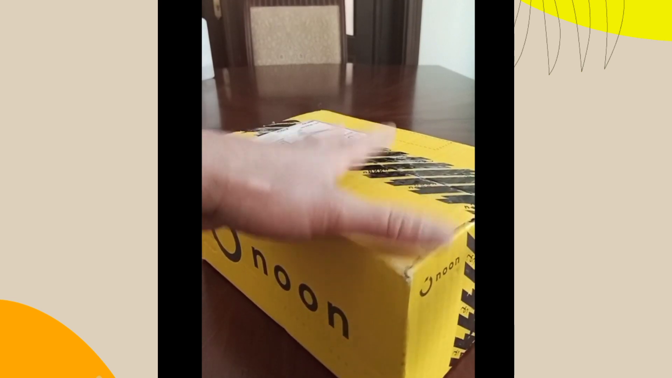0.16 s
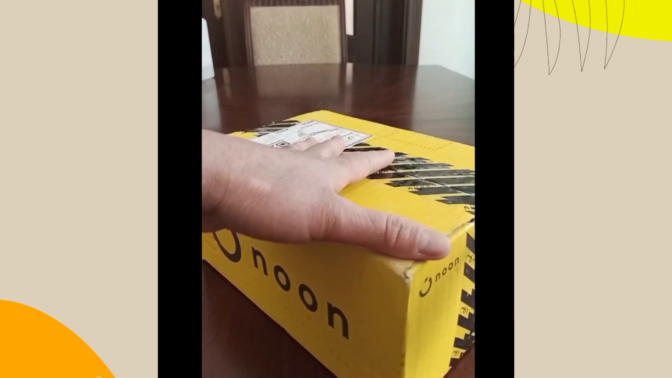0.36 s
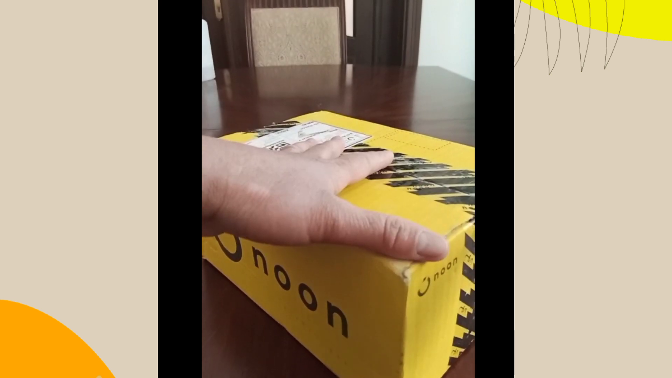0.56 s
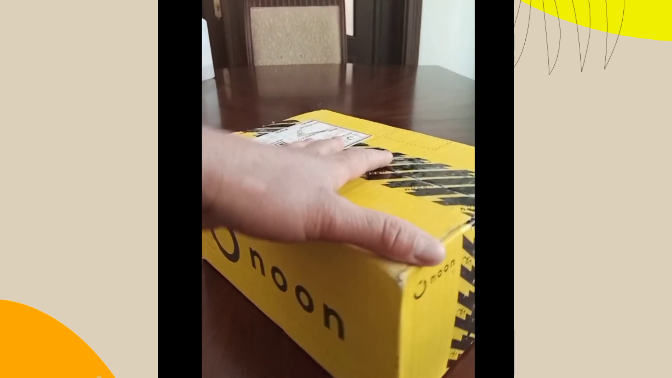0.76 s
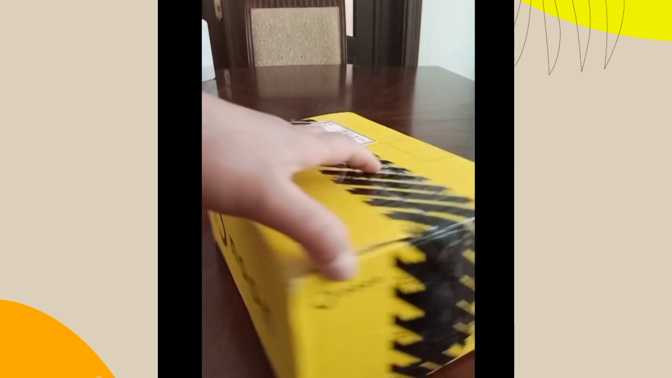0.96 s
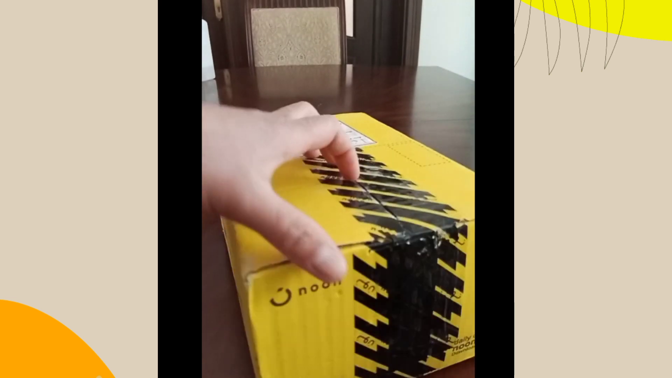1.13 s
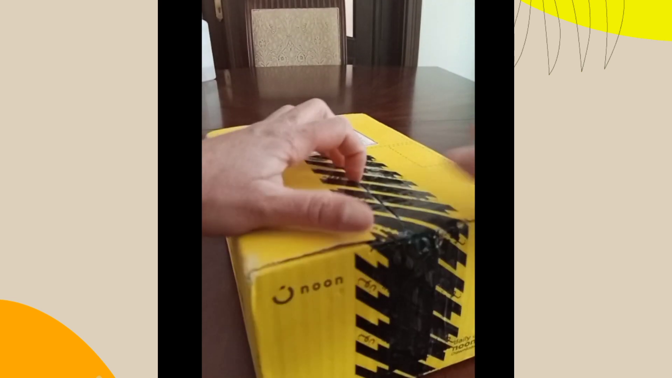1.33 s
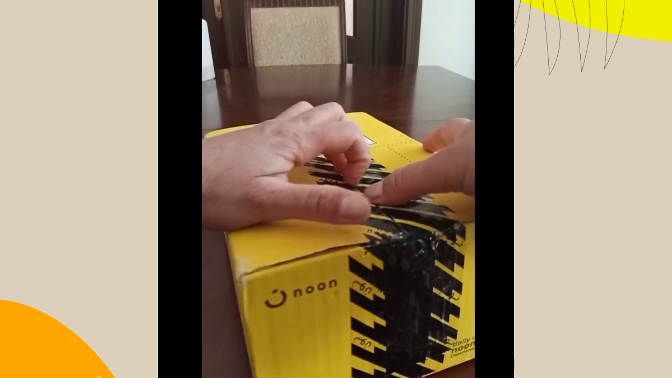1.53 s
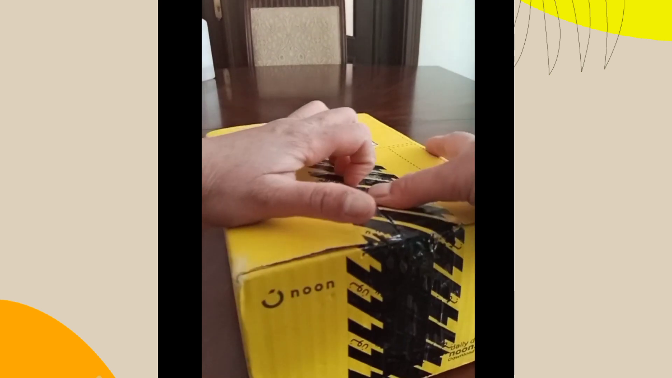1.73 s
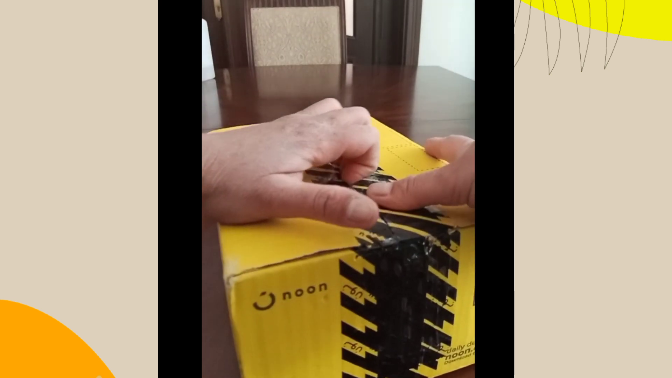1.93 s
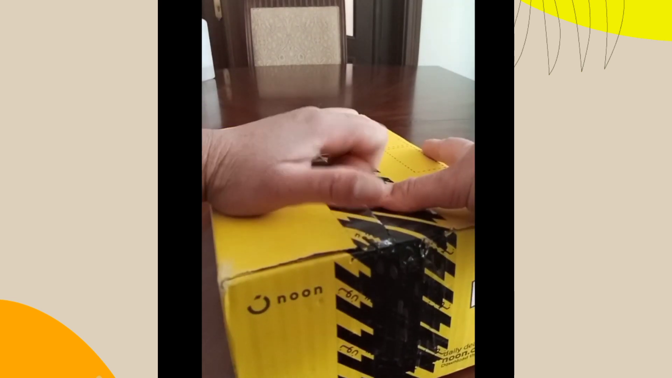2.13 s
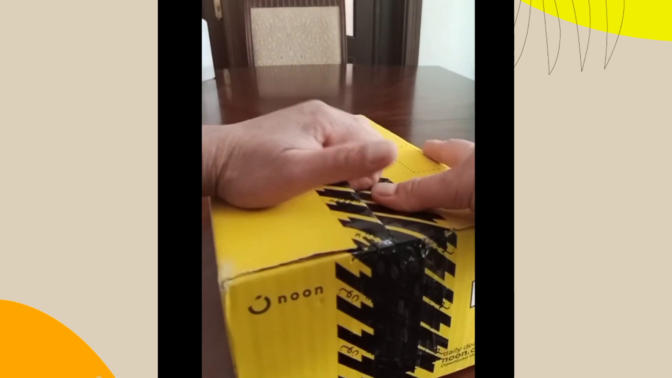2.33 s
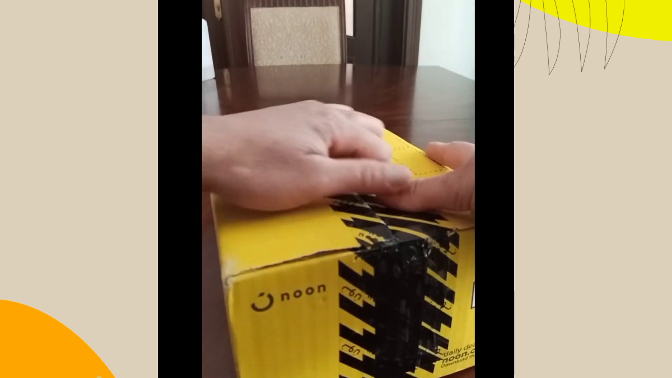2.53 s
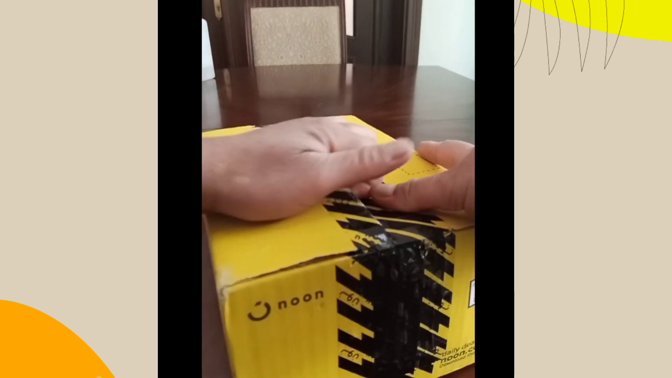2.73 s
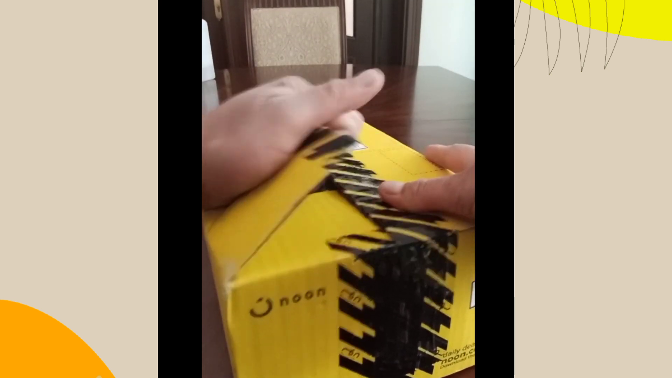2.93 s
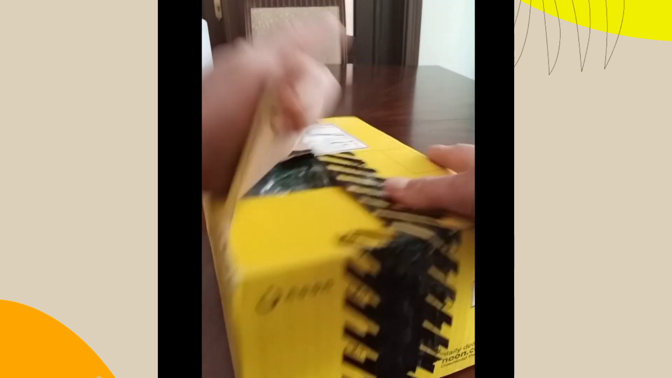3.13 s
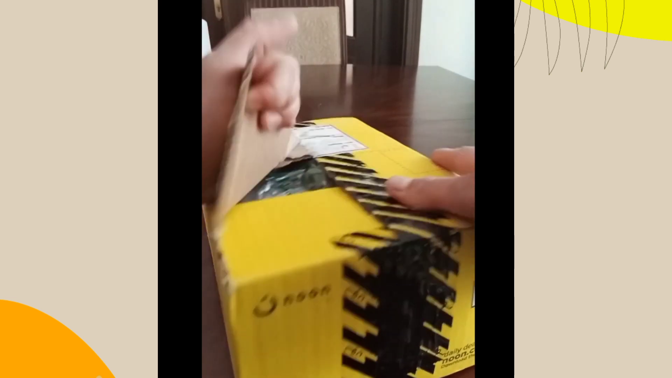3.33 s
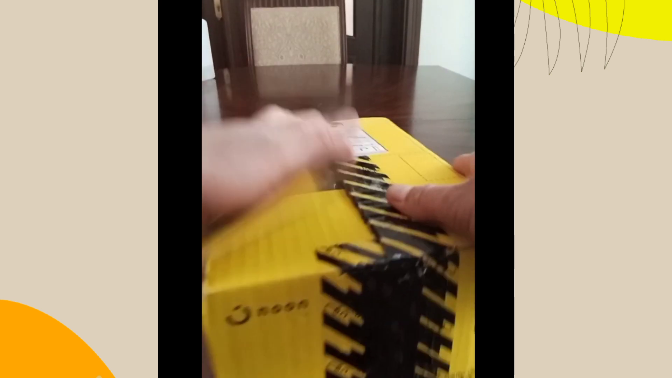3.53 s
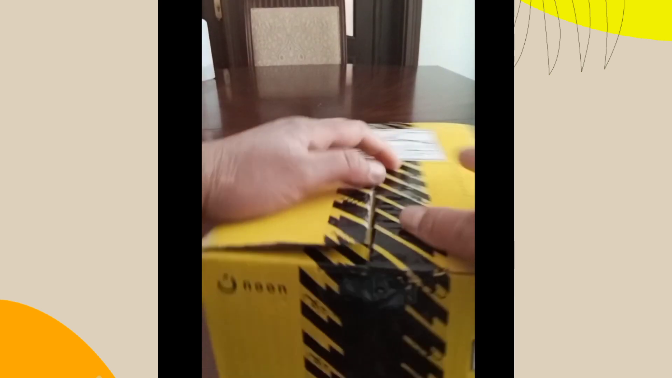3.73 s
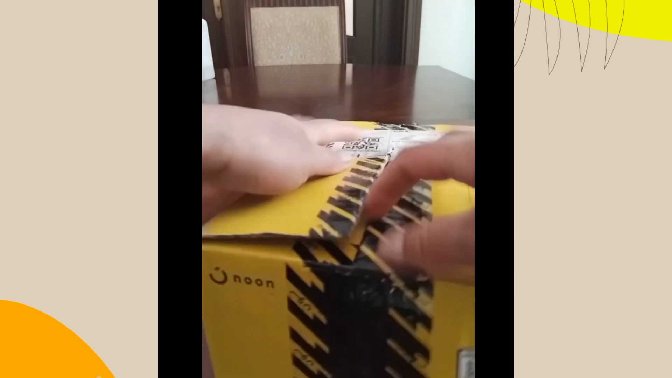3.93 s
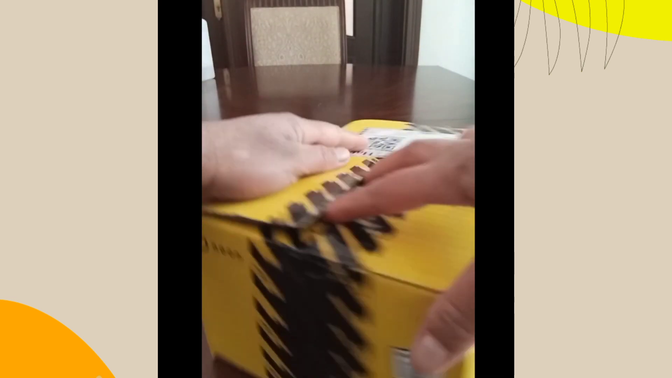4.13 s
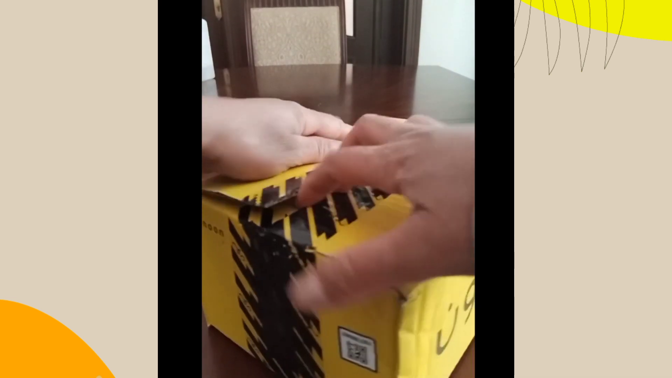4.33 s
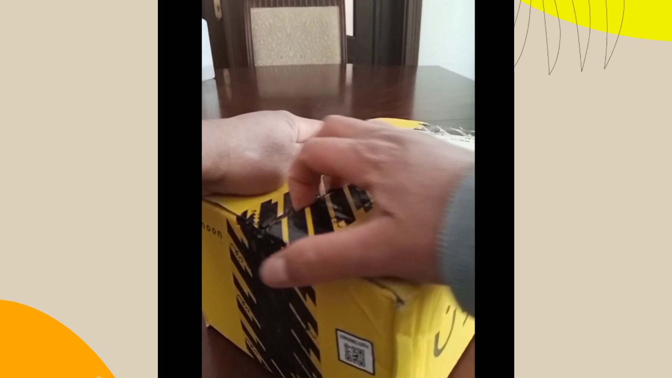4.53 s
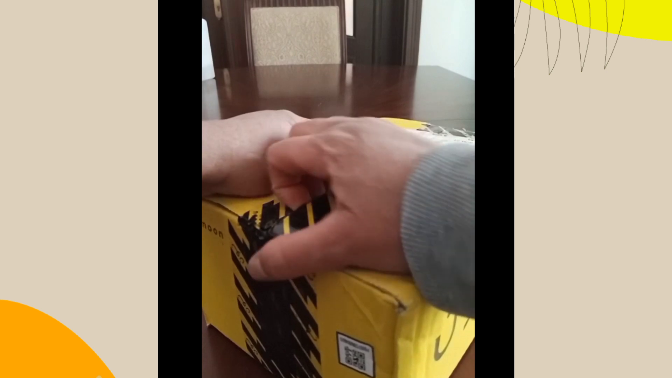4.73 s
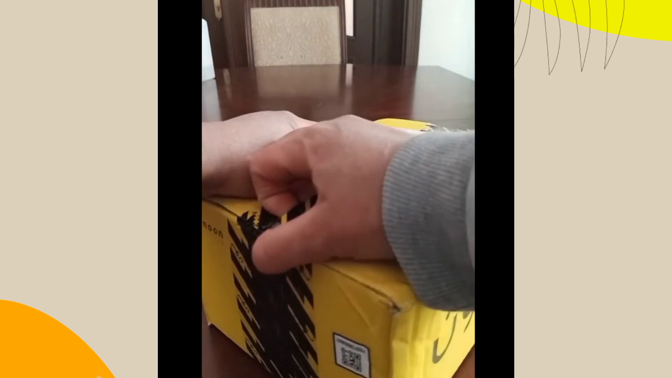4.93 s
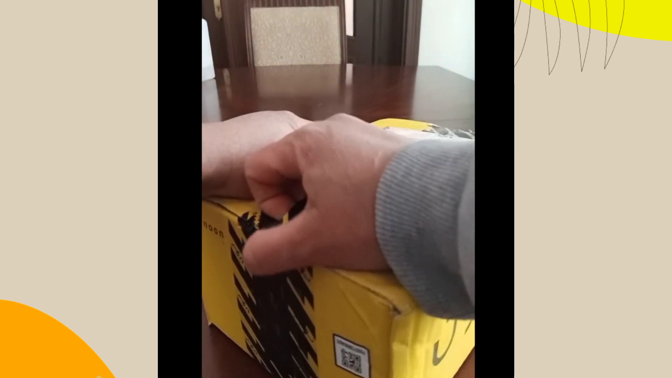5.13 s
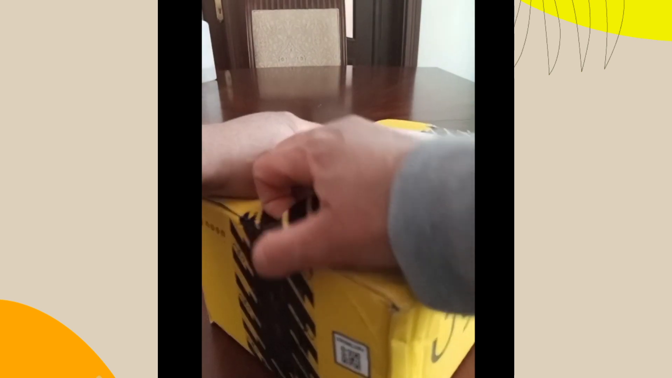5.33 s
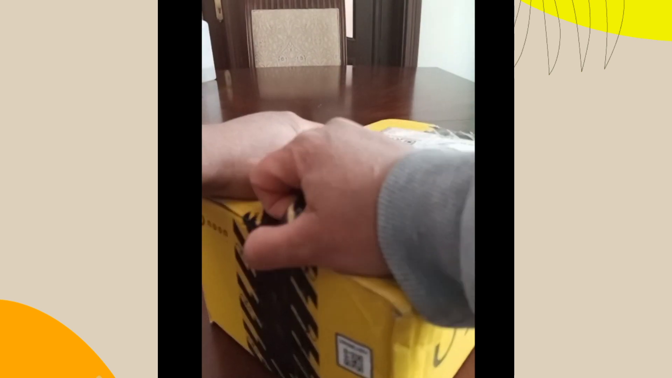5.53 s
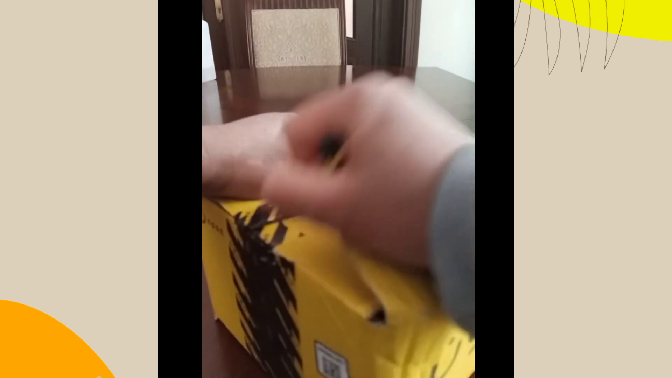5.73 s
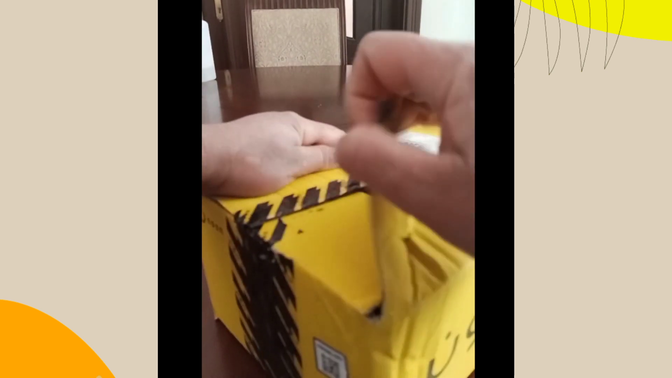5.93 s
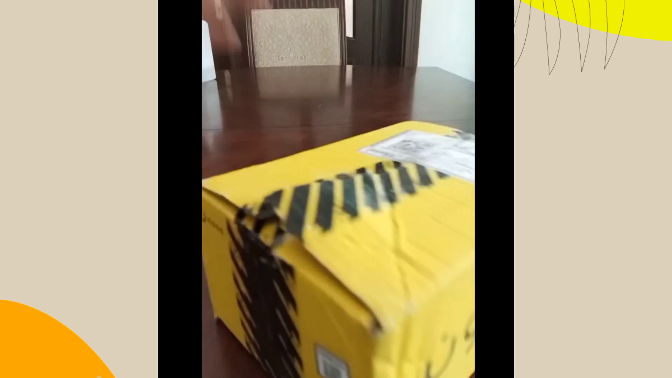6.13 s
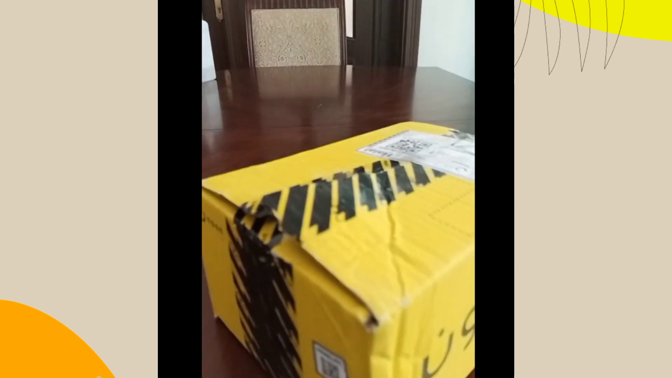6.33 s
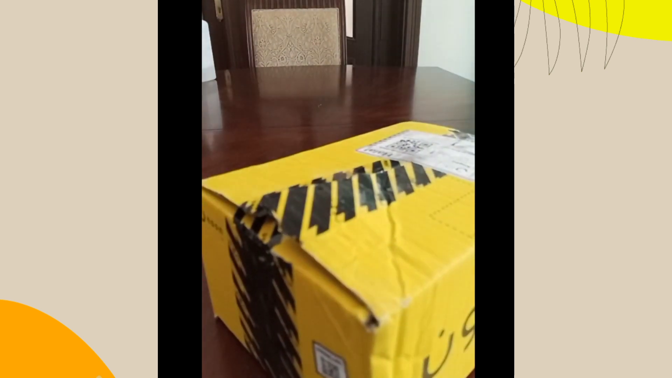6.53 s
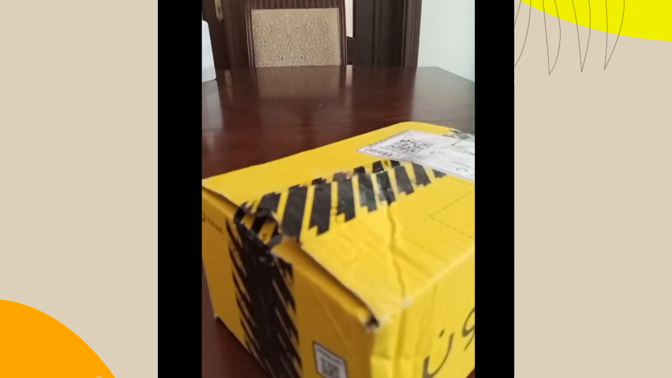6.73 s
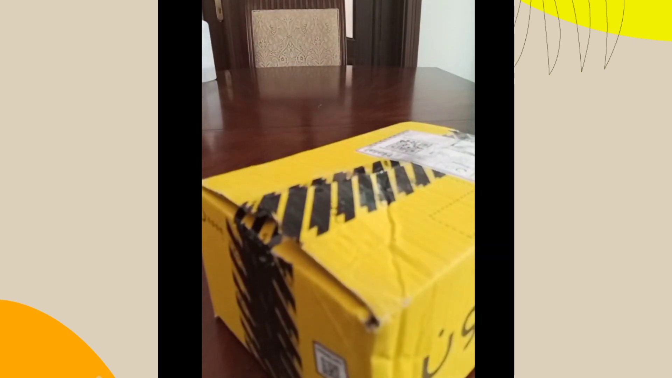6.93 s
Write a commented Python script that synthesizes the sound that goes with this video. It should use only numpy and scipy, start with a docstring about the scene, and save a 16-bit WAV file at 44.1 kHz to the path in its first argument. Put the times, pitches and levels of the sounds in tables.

```python
"""A cardboard box is dragged over a table by hand; its packing tape is picked at and its flaps torn open. Tape
and card snap loose in short noise cracks, and each push rings the hollow box as decaying sines. In between,
skin and card rub as filtered friction noise; short fuzzy tones and brief pitched ticks sound now and then. The
place is a small quiet room that answers the snaps, over a faint hiss and rumble. A phone lies close by; its
microphone port rings near 4 kHz."""
import sys
import numpy as np
from scipy import signal
from scipy.fft import rfft, irfft, next_fast_len
from scipy.io import wavfile
from scipy.ndimage import uniform_filter1d, map_coordinates

SR = 44100
rng = np.random.default_rng(int(sys.argv[2]) if len(sys.argv) > 2 else 0)


def materialize(psi):
    """Save the field psi as 16-bit PCM at rate SR to the path in sys.argv[1].

    A 1-D psi becomes a single channel; in a 2-D psi each row is a channel.
    """
    bounded = np.clip(np.atleast_2d(psi).T, -1, 1)
    quanta = np.round(bounded * 32767).astype(np.int16)
    wavfile.write(sys.argv[1], SR, quanta)


N = 311787  # samples, about 7.07 s


def amp(db):
    """Amplitude factor of a level in dB."""
    return 10 ** (np.asarray(db) / 20)


def unit(x):
    """x scaled to an RMS of 1."""
    return x / np.sqrt(np.mean(x ** 2) + 1e-20)


def along(points, hz):
    """Interpolate (f/Hz, value) points on a log frequency axis."""
    f, v = np.transpose(points)
    return np.interp(np.log(hz + 1), np.log(f + 1), v)


def wobble(rate):
    """A smooth random curve with rate knots a second."""
    knots = rng.standard_normal(int(N * rate / SR) + 4)
    return map_coordinates(knots, [np.arange(N) * rate / SR])


def coloured(x, spectrum, size=4096):
    """x through a causal minimum-phase filter of energy 1, shaped by (f/Hz, level/dB) points."""
    level_db = np.maximum(along(spectrum, np.fft.rfftfreq(size, 1 / SR)), -90)
    # folding the cepstrum forward makes the filter causal
    cepstrum = irfft(np.log(amp(level_db)), size)
    cepstrum[1:size // 2] *= 2
    cepstrum[size // 2 + 1:] = 0
    pulse = irfft(np.exp(rfft(cepstrum)), size)
    return signal.fftconvolve(x, pulse / np.linalg.norm(pulse))[:N]


CARD_TOP_HZ = 3500  # soft card rings ever less above this


def peaks(modes):
    """The spectrum of (f/Hz, width/Hz, level/dB) card resonances side by side."""
    hz = np.geomspace(20, SR / 2, 600)
    power = 0
    for centre, width, db in modes:
        damping = (hz * width) ** 2
        power = power + amp(2 * db) * damping / ((centre * centre - hz * hz) ** 2 + damping)
    softened = power / (1 + (hz / CARD_TOP_HZ) ** 2)
    return np.transpose([hz, 20 * np.log10(softened)])


# hiss and rumble of room and microphone, relative spectrum: (f/Hz, level/dB per Hz)
AIR_SPECTRUM = [(15, -52.5), (25, -24.5), (55, 2), (154, -13), (202, -1.5), (329, -13.5), (376, -11.5),
                (431, -30.5), (480, -12), (972, -21.5), (1970, -26.5), (5080, -25.5), (8050, -40.5),
                (15000, -37.5), (16300, -42.5)]


def air():
    """The quiet hiss and rumble of room and microphone: coloured noise whose level drifts slightly."""
    level_db = -76 + 0.29 * wobble(6)
    return amp(level_db) * coloured(rng.standard_normal(N), AIR_SPECTRUM)


# short fuzzy tones and brief pitched ticks: (t/s, length/s, f/Hz, width/Hz, level/dB)
FUZZY_TONES = [(0.011, 0.14, 3900, 50, -71.5), (0.042, 0.12, 4700, 80, -80), (.27, 0.27, 4020, 60, -82.5),
               (.61, 0.019, 946, 40, -55.5), (.612, 0.031, 2410, 59.7, -71),
               (0.701, 0.019, 4180, 59, -56.5), (.97, 0.037, 2500, 147, -50),
               (1.701, 0.079, 4500, 147, -66.5), (2.33, 0.23, 800, 59.3, -53.5),
               (2.402, 0.19, 2100, 80, -63), (1.993, .11, 2690, 150, -55.5), (2.59, 0.065, 2800, 98, -60),
               (2.738, 0.13, 850, 60, -59.5), (2.78, .07, 2700, 100, -59.5), (2.791, 0.09, 1800, 100, -83),
               (3.763, 0.089, 1478, 59.7, -58), (3.76, 0.071, 4165, 148, -47.5),
               (3.901, 0.047, 1050, 81.8, -61), (4.107, 0.063, 2300, 78.5, -65.5),
               (4.814, 0.053, 2580, 100.3, -56.5), (4.804, 0.091, 1517, 144.6, -57.5),
               (4.888, 0.049, 1600, 136.4, -54), (4.112, 0.074, 5900, 150, -67),
               (4.57, 0.046, 1620, 152, -58.5), (5.14, 0.034, 1585, 80, -61),
               (5.241, 0.067, 500.3, 39.2, -55.5)]


def fuzzy_tones():
    """Each tone swells and fades while its phase wanders at random, so that it is a fuzzy line."""
    out = np.zeros(N + SR)
    for s, length, hz, width_hz, db in FUZZY_TONES:
        chance = rng.standard_normal(SR // 2)
        t = np.arange(round(length * SR)) / SR
        steps = uniform_filter1d(chance, size=40)[:len(t)]
        drift = np.cumsum(steps) * np.sqrt(2 * np.pi * width_hz / SR)
        swell = np.sin(np.pi * t / length)
        out[round(s * SR):][:len(t)] += amp(db) * swell * np.sin(2 * np.pi * hz * t + drift)
    return out[:N]


# hands at rest on the box, level/dB of: hollow box, flaps and walls, scrape, fizz
REST_LEVELS = [-80, -86, -86.5, -104]
# short rubs and pats of the hands: (t/s at full strength, rise/s, hold/s, fall/s, then level/dB of
# hollow box, flaps and walls, skin and tape scrape, film fizz, then share of dry rasp 0-1)
HAND_STROKES = [(.22, 0.37, 0, .05, -76, -94, -73.5, -104, 0.28),
                (0.252, 0.027, 0.0093, 0.053, -43, -56, -54, -99, 0.23),
                (.3, .04, 0, .1, -48, -79, -75, -104, 0.75),
                (0.803, 0.022, .16, 0.036, -67.5, -73, -63.5, -86, 0.59),
                (1.883, 0.17, 0, 0.46, -65.5, -78.5, -85.5, -99, .25),
                (2.03, 0.14, 0.075, 0.03, -65, -78.5, -53.5, -80.5, .27),
                (2.206, 0.012, 0, 0.079, -46, -48.5, -37, -61.5, 0.3),
                (2.319, 0.023, 0.0087, 0.067, -44, -51.5, -42, -100, 0.23),
                (2.353, 0.024, 0.068, 0.14, -56, -55, -44.5, -90, 0.079),
                (2.47, 0.042, 0.048, 0.028, -60, -65.5, -43.5, -70, 0.28),
                (2.627, 0.064, 0.019, .07, -82, -70.5, -56, -82, 0.041),
                (2.721, 0.038, 0.0038, 0.051, -57, -51.5, -46.5, -96.5, 0.22),
                (2.8, 0.057, 0.011, 0.067, -45.5, -60, -48, -74, 0.19),
                (3.696, 0.071, 0.0068, 0.023, -48, -67, -58, -91, 0.11),
                (3.772, 0.088, 0.07, 0.067, -63.5, -67.5, -48.5, -69.5, 0.36),
                (3.93, 0.13, 0.17, 0.11, -64, -70.5, -62, -88.5, .2),
                (4.008, 0.027, 0.0023, 0.06, -34.5, -57.5, -60, -81.5, .16),
                (4.169, 0.04, .08, 0.11, -64, -68, -52.5, -79, 0.77),
                (4.314, 0.016, 0.0047, 0.039, -37, -45, -39.5, -68, 0.25),
                (4.388, 0.065, 0.012, 0.14, -68.5, -67, -63, -82, 0.22),
                (4.547, 0.045, 0.0046, 0.046, -50, -54, -45, -61.5, 0.364),
                (4.63, 0.04, 0.27, 0.11, -81, -76, -66, -84.5, .38),
                (4.821, 0.087, 0.071, 0.029, -68, -74, -57.5, -89, 0.38),
                (5.022, .06, 0.0013, 0.052, -53, -68.5, -54, -78, 0.28),
                (5.159, 0.034, 0.0019, 0.12, -63, -68.5, -60, -85.5, 0.21),
                (5.249, 0.053, 0.0043, .04, -55.5, -77.5, -61.5, -100, 0.17),
                (5.348, 0.026, 0.0047, 0.029, -43, -50, -49, -76.5, .32),
                (5.491, 0.034, 0.014, 0.029, -38.5, -51, -44.5, -79, 0.13),
                (5.563, 0.05, 0, 0.067, -45.5, -54.5, -49, -76, 0.21),
                (7.065, 0.024, 0.009, 0.066, -75.5, -85.5, -59, -80.5, 0.23)]
# long pulls, one curve each: the box is turned, the first flap rips open, the second one is torn at;
# (t/s, then level/dB of hollow box, flaps and walls, skin and tape scrape, film fizz, then share of rasp 0-1)
LONG_PULLS = [
    [(.982, -69, -76, -73, -93.5, 1), (.999, -57, -41, -50, -74.5, 0.57), (1.046, -39, -37, -46, -91, 0.58),
     (1.139, -46, -55.5, -61, -101.5, 0.25), (1.183, -47, -41, -41.5, -77.5, 0.3),
     (1.211, -35, -49, -55, -85.5, 0.3), (1.239, -42, -48, -42.5, -75, 0.5),
     (1.299, -33, -36, -44.5, -78, 0.2), (1.395, -41, -42.5, -52.5, -95.5, 0.4),
     (1.43, -40, -41, -52.5, -115, 0.2), (1.584, -44, -60, -52.5, -96, 0.1),
     (1.702, -85.5, -83, -64, -96.5, 0.22), (1.82, -81.5, -78, -71.5, -99, 0.4)],
    [(2.848, -55, -61, -53, -88, 0), (2.922, -46, -57, -45.5, -65.5, 0.07),
     (2.953, -49, -38, -26, -37, 0.32), (2.985, -47.5, -40.5, -41, -70.5, 0.7),
     (3.039, -36.5, -33, -34.5, -59.5, 0.73), (3.115, -41.5, -39, -41.5, -80.5, 0.45),
     (3.191, -45, -41.5, -37.5, -55, 0.7), (3.269, -38.5, -41.5, -40.5, -54.5, 0.37),
     (3.348, -54.5, -46, -48.5, -79, 0.72), (3.48, -66, -55.5, -44.5, -74, 0.19),
     (3.55, -50, -66, -39.5, -69, 0.26), (3.632, -72.5, -70.5, -51.5, -83, 0.13),
     (3.68, -79, -80.5, -65, -98, 0.1)],
    [(5.607, -65, -66, -69.5, -103, 0.4), (5.668, -45, -37.5, -21, -43.5, 0.44),
     (5.694, -48, -48, -38.5, -61, 0.36), (5.761, -36, -34, -36, -67.5, 0.39),
     (5.859, -37.5, -40.5, -38, -64, 0.34), (5.937, -49, -48, -39, -65, 0.35),
     (6.04, -48, -47, -44, -79, .2), (6.066, -49.5, -48, -26, -60, 0.3), (6.1, -44, -47.5, -53.5, -79, 0.2),
     (6.174, -48.5, -57, -61, -104, 0.35), (6.206, -71, -69.5, -69, -99, .6),
     (6.305, -75.5, -73, -72.5, -92.5, 0.77), (6.55, -77, -76, -75, -103, .7),
     (7.03, -83.5, -85, -84, -104, 0.45)],
]
EDGE_DB = 20  # a stroke gains this over its rise time and loses it over its fall time
BOX_FALL = 0.9  # fall time of the hollow box, as a factor on that of the contact


def handling():
    """Level curves of hollow, flaps, scrape and fizz, and rasp share: rest, strokes and pulls add their power."""
    t = np.arange(0, N / SR, 1 / 500)
    parts = [(np.outer(REST_LEVELS, np.ones_like(t)), .4)]
    for s, rise, hold, fall, *db, share in HAND_STROKES:
        before = np.maximum(s - t, 0) / abs(rise)
        after = np.maximum(t - s - abs(hold), 0) / abs(fall) / np.array([[BOX_FALL], [1], [1], [1]])
        parts.append((np.array(db)[:, None] - EDGE_DB * (before + after), share))
    for rows in LONG_PULLS:
        s, *db, share = np.transpose(rows)
        # a pull is silent outside its own curve
        curves = np.array([np.interp(t, s, c, -200, -200) for c in db])
        parts.append((curves, np.interp(t, s, share)))
    power = sum(amp(2 * db) for db, share in parts)
    # the rasp share is weighted by scrape power
    rasp = sum(amp(2 * db[2]) * share for db, share in parts) / power[2]
    curves = [*10 * np.log10(power), np.clip(rasp, 0, 1)]
    return [np.interp(np.arange(N) / SR, t, c) for c in curves]


def grit(streak_db, flutter_db, catch_db, share):
    """Friction noise: narrow streaks that come and go, a flutter, and a share of samples catching harder."""
    _, frames, z = signal.stft(rng.standard_normal(N), nperseg=512)
    field = uniform_filter1d(rng.standard_normal(z.shape), size=2, axis=0)
    field = uniform_filter1d(field, size=14, axis=1)
    gain = amp(streak_db[np.minimum(frames, N - 1).astype(int)] * unit(field))
    gain = gain / np.sqrt(np.mean(gain ** 2, axis=0))  # each frame's gain has an RMS of 1
    noise = signal.istft(z * gain, nperseg=512)[1][:N]
    luck, size = rng.random(N), rng.exponential(1, N)
    catches = np.clip((share - luck) / 0.0054, 0, 1) * catch_db * size
    flutter = flutter_db * (wobble(25) + wobble(90))
    return noise * amp(catches + flutter)


# scrape heard through the ringing microphone port, relative spectrum: (f/Hz, level/dB per Hz)
PORT_SCRAPE = [(1940, -28.5), (3300, -5.5), (3570, -4), (4030, 9.5), (4540, 7.5), (5000, -1), (5590, -17.5),
               (6050, -20), (6580, -18), (7250, -41), (8360, -55.5), (9500, -45.5), (12400, -80.5),
               (20900, -120)]
# dry rasp, broader and brighter, relative spectrum: (f/Hz, level/dB per Hz)
DRY_RASP = [(2600, -21), (3300, -9), (3700, -1.5), (4200, 0), (5000, 4), (5600, -2.5), (6200, -11.5),
            (7000, -15.5), (8400, -42), (12000, -68.5)]


def scraped(x, share):
    """The bright part of a contact, shared between microphone port ring and dry rasp."""
    return coloured(x * (1 - share), PORT_SCRAPE) + coloured(x * share, DRY_RASP)


# card walls over the flaps, as the hands move about the box: (t/s, level/dB)
WALL_OVER_FLAP = [(0, -7), (1.0, 0.5), (1.75, 4), (2.05, -1), (2.5, -4), (3.0, -4), (3.45, -5.5), (3.7, 2),
                  (4.05, -2), (4.3, -5.5), (4.9, 1.5), (5.1, -5.5), (5.56, 0.5), (5.8, -5.5), (7.07, -4.5)]


def wall_over_flap_db(t):
    """How far the walls stand above the flaps in dB at time t in seconds."""
    return np.interp(t, *np.transpose(WALL_OVER_FLAP))


# how a rub feels: faint is smooth, light is streaky, hard crackles;
# (scrape level/dB, streaks/dB, flutter/dB, catches/dB)
TOUCH_RULES = [(-88, 0, 1.2, 1), (-72, 2.5, 0.5, 0.3), (-60, 5, 1.62, 3), (-48.5, 4.5, 0.88, 4.5),
               (-35.5, 2.5, 1.32, 5)]
# rumble of the hollow box under a rub, relative spectrum: (f/Hz, level/dB per Hz)
HOLLOW_RUMBLE = [(25, -28.5), (50, -29.5), (100, -3), (130, -0.5), (160, -2), (230, 2.5), (320, 1),
                 (380, -11), (520, -63)]
# resonances of the flaps: (f/Hz, width/Hz, level/dB)
FLAP_MODES = [(384, 100, 1.5), (489.7, 86, 0.5), (615, 170, -1.5), (823, 260, 0)]
# resonances of the box walls: (f/Hz, width/Hz, level/dB)
WALL_MODES = [(906, 97, 8), (1067, 20, 5), (1298, 470, 7.5), (1500, 37, 3.5), (1734, 820, 8),
              (1885, 420, 2)]
# scrape of the card itself, relative spectrum: (f/Hz, level/dB per Hz)
CARD_SCRAPE = [(1500, -28), (2000, -8), (2400, 3), (2780, 8.5), (3200, -1), (3900, -48)]
# fizz of rubbed tape film, relative spectrum: (f/Hz, level/dB per Hz)
FILM_FIZZ = [(5500, -26.5), (7500, -8.5), (8100, -22.5), (9000, -15), (10200, -10), (12000, -15),
             (13500, -13.5), (15100, 7), (15500, -5), (15900, -33.5), (16500, -49)]
CARD_DB, CARD_FOLLOWS = -3.5, 0.54  # card offset, and its share of skin scrape against walls


def rubbing(hollow_db, flap_db, scrape_db, fizz_db, rasp):
    """One rough contact drives card, port and film; hollow, flaps and walls rumble on a drag of their own."""
    wall_db = flap_db + wall_over_flap_db(np.arange(N) / SR)
    card_db = CARD_DB + CARD_FOLLOWS * scrape_db + (1 - CARD_FOLLOWS) * wall_db
    force_db, *rules = np.transpose(TOUCH_RULES)
    rough = [np.interp(scrape_db, force_db, r) for r in rules]
    contact = grit(*rough, share=0.0087)
    drag = grit(*rough, share=.01)
    box = coloured(amp(hollow_db) * drag, HOLLOW_RUMBLE)
    box += coloured(amp(flap_db) * drag, peaks(FLAP_MODES))
    box += coloured(amp(wall_db) * drag, peaks(WALL_MODES))
    bright = scraped(amp(scrape_db) * contact, rasp)
    bright += coloured(amp(card_db) * contact, CARD_SCRAPE)
    bright += coloured(amp(fizz_db) * contact, FILM_FIZZ)
    return box + bright


# snaps, taps and bumps near the microphone: (t/s, crack level/dB, box thump level/dB,
# flaps and walls level/dB, card scrape level/dB, t60 of the tear/s before its limits)
SNAP_EVENTS = [(0.2373, -35, -36.5, -60, -40, 0.0057), (0.2492, -29, -30, -37, -35, 0.015),
               (.618, -51.5, -75, -50.5, -43.5, 0.016), (0.7086, -53, -64, -70, -67, 0.0097),
               (0.9927, -28, -19, -21, -30, 0.041), (1.0039, -46, -37, -20, -27, 0.0047),
               (1.0343, -28, -34.5, -24, -24, 0.03), (1.1742, -23, -23, -15, -14, 0.021),
               (1.1863, -23, -31, -31, -19, 0.034), (1.2279, -18.5, -26, -18, -17, 0.029),
               (1.2431, -24.5, -39, -23, -16, .034), (1.2675, -45, -27.5, -20, -51, 0.023),
               (1.2861, -53, -39, -29, -49, 0.008), (1.4098, -36, -33, -22.5, -21.5, 0.0089),
               (1.4177, -41, -27, -26, -29.5, 0.055), (1.5278, -27, -45, -39, -32, 0.0099),
               (2.1951, -18.5, -24, -24, -18.5, 0.016), (2.2074, -23.5, -32.5, -47, -33, 0.021),
               (2.3137, -7, -23.5, -22.5, -19, 0.016), (2.3814, -16.5, -35, -32, -25.5, 0.01),
               (2.441, -34, -60, -66, -54, 0.0091), (2.4703, -25.5, -67, -60, -34, 0.027),
               (2.511, -31, -59, -67, -43, 0.035), (2.5923, -34, -75, -59, -47, 0.03),
               (2.6312, -34, -75, -66, -50, 0.011), (2.72, -19.5, -33.5, -29, -27, 0.013),
               (2.7935, -32, -56, -58, -43, 0.025), (2.8752, -27.5, -43, -60, -58, 0.0089),
               (2.8947, -30, -29, -60, -37, 0.029), (2.9126, -6.5, -49, -37, -25, .0053),
               (2.9418, -9.5, -22.5, -47, -24, 0.013), (2.9527, 0, -41, -16.5, -15, 0.015),
               (2.9604, -29, -19, -40, -44, .0081), (3.1368, -19, -27, -26, -45, 0.015),
               (3.1572, -19, -37, -29, -41, 0.01), (3.1779, -17, -20.5, -21, -22, 0.011),
               (3.1919, -12.5, -45, -20.5, -15.5, 0.032), (3.2022, -41, -42, -43, -19, 0.0061),
               (3.2622, -14.5, -45, -23.5, -19.5, 0.0054), (3.2812, -19, -36, -29, -21, 0.015),
               (3.371, -19.5, -65, -40, -31.5, 0.017), (3.3823, -24.5, -55, -36, -31, 0.017),
               (3.468, -32.5, -64, -42, -40.5, 0.081), (3.9978, -40.5, -37.5, -55, -56, 0.075),
               (4.3006, -36, -27.5, -46, -43, 0.018), (4.3165, -30.5, -34.5, -47, -37, 0.026),
               (4.3408, -37.5, -61.5, -64.5, -43, 0.038), (4.4384, -47.5, -54.5, -63.5, -51, 0.045),
               (4.54, -31, -52.5, -52.5, -41.5, 0.054), (4.5683, -51, -44, -52.5, -38.5, 0.015),
               (4.814, -44, -57.5, -47.5, -56, 0.018), (4.8316, -43.5, -51, -48.5, -52.5, 0.011),
               (4.8439, -51, -64.5, -47, -61.5, 0.022), (5.0304, -45.5, -48, -59.5, -62.5, 0.014),
               (5.158, -46.5, -69.5, -62, -57, 0.013), (5.1826, -42.5, -67, -77.5, -58.5, 0.014),
               (5.246, -41.5, -48, -61.5, -56.5, 0.025), (5.3372, -34.5, -29.5, -39.5, -45.5, 0.013),
               (5.3467, -46.5, -33.5, -41, -53, 0.024), (5.463, -12.5, -52, -39.5, -50, 0.0082),
               (5.4913, -22.5, -24, -25.5, -36, 0.013), (5.5368, -37.5, -43, -66, -60, 0.01),
               (5.5527, -50, -53, -41.5, -47, 0.055), (5.6307, -46, -57, -50, -31, .0053),
               (5.666, -8, -24, -29.5, -17.5, 0.029), (5.6745, -7, -26, -11, -43, 0.0058),
               (5.74, -14.5, -59, -6, -13.5, 0.0069), (5.7606, -16, -40, -46, -15, 0.0038),
               (5.8477, -16, -29, -56, -27, 0.036), (5.9013, -30, -37, -33, -44, 0.052),
               (5.9163, -23, -27, -38, -45, 0.12), (5.9328, -21, -46, -55, -41, 0.02),
               (5.949, -15.5, -48, -47, -35, 0.022), (5.9833, -19.5, -35, -32, -42, 0.027),
               (5.9927, -16, -27.5, -30.5, -26, 0.013), (6.011, -23, -37, -33, -55, .016),
               (6.0327, -19.5, -46, -51, -41, 0.0078), (6.065, -14.5, -51, -57, -32, 0.028),
               (6.0712, -17.5, -35, -40, -28, 0.008), (6.0827, -43, -21.5, -46, -42.5, .014),
               (6.118, -31, -39.5, -41.5, -37.5, 0.077), (7.0516, -41.5, -68, -77, -76.5, 0.017)]
# ringing tones of the hollow box, before a random spread: (f/Hz, relative level/dB, t60/s)
BOX_TONES = [(71, -24.5, 0.017), (121, -24, 0.12), (185, -5.5, 0.14), (235.3, 7, 0.059), (301, 10, 0.033)]
# fizz of a snap, duller than that of a rub, relative spectrum: (f/Hz, level/dB per Hz)
SNAP_FIZZ = [(5500, -21.5), (7500, -4.5), (8300, -6), (10000, -10.5), (13000, -14.5), (15100, -3),
             (15600, -8.5), (16300, -31)]
SNAP_WALL_DB = 1  # walls ring more at a snap
# fizz over the crack in dB, share of the surrounding rub's brightness, fizz dB per dB of crack
SNAP_FIZZ_DB, SNAP_FIZZ_FOLLOWS, SNAP_FIZZ_GROWS = -12.5, .6, 1.2


def box_ring(after, chance):
    """The hollow box as decaying sines, each a little off in level, pitch and phase; not yet levelled."""
    ring = 0
    for (hz, db, life), luck, detune in zip(BOX_TONES, chance, chance[::-1]):
        offset_db = 2.5 * luck
        decay = amp(db + offset_db - 60 * after / life)
        phase = 2 * np.pi * hz * (1 + 0.03 * detune) * after + .6 * offset_db
        ring = ring + decay * np.sin(phase)
    return ring * (1 - np.exp(-after / 0.0004))  # soft onset


def snaps(bright_db, rasp):
    """Faint noise swells for 25 ms, then a spike and dying noise; the push rings the box."""
    lead = SR // 40
    t = np.arange(-lead, SR // 5) / SR
    after = np.maximum(t, 0)
    swell = (t < 0) * amp(-28) * (1 + t * SR / lead)  # grows from nothing up to the spike
    tears, thump = np.zeros((5, N + SR)), np.zeros(N + SR)
    for s, crack_db, thump_db, flap_db, card_db, t60 in SNAP_EVENTS:
        t60 = np.clip(t60, .004, .2)
        wall_db = flap_db + SNAP_WALL_DB + wall_over_flap_db(s)
        fizz_db = SNAP_FIZZ_GROWS * crack_db + SNAP_FIZZ_DB
        fizz_db += SNAP_FIZZ_FOLLOWS * bright_db[round(s * SR)]
        chance = rng.standard_normal((6, len(t)))
        tear = (swell + (t > 0) * amp(-60 * after / t60)) * chance[:5]
        # the noise energy is set by t60 alone, whatever the random draw
        tear *= np.sqrt(t60 * SR / 25) / np.linalg.norm(tear, axis=1, keepdims=True)
        tear[:, lead] = 1.1  # the spike
        start = round(s * SR) - lead
        at = slice(start, start + len(t))
        tears[:, at] += amp([crack_db, flap_db, wall_db, card_db, fizz_db])[:, None] * tear
        ring = box_ring(after, chance[5])
        thump[at] += amp(thump_db) * ring / np.abs(ring).max()
    crack, flap, wall, card, fizz = tears[:, :N]
    out = thump[:N] + scraped(crack, rasp)
    out += coloured(flap, peaks(FLAP_MODES)) + coloured(wall, peaks(WALL_MODES))
    return out + coloured(card, CARD_SCRAPE) + coloured(fizz, SNAP_FIZZ)


# decay of the small room: (f/Hz, t60/s)
ROOM_DECAY = [(200, 0.34), (2000, 0.039), (12000, 0.34)]


def room(x):
    """The room's answer is noise in which each frequency dies at its own speed, 200 samples late."""
    hz, t, z = signal.stft(rng.standard_normal(SR // 2), SR, nperseg=256)
    decay = amp(-60 * t / along(ROOM_DECAY, hz)[:, None])
    tail = signal.istft(z * decay, SR, nperseg=256)[1]
    return signal.fftconvolve(np.pad(x, (200, 0)), tail / np.linalg.norm(tail))[:N]


def scene():
    """Snaps with their room answer, rubbing, fuzzy tones and air, added up."""
    hollow_db, flap_db, scrape_db, fizz_db, rasp = handling()
    hits = snaps(fizz_db - scrape_db, rasp)
    rubs = rubbing(hollow_db, flap_db, scrape_db, fizz_db, rasp)
    return (hits + amp(-16.0) * room(hits) + rubs + fuzzy_tones() + air())[None]


def record(dry):
    """The phone's microphone drops the deep bass and keeps nothing above its band limit."""
    bass_hz, top_hz = 35, 16400
    size = next_fast_len(N + SR // 4)
    hz = np.fft.rfftfreq(size, 1 / SR)
    bass_cut = (1j * hz / (bass_hz + 1j * hz)) ** 2
    return irfft(rfft(dry, size) * bass_cut * (hz < top_hz), size)[:, :N]


dry = scene()
out = record(dry)
materialize(out)
```